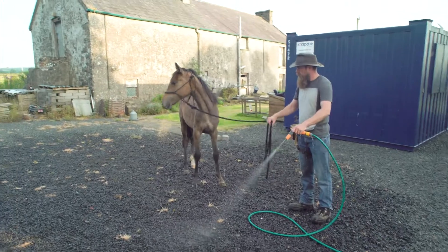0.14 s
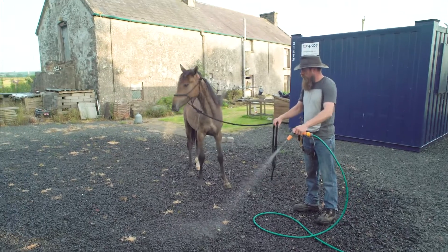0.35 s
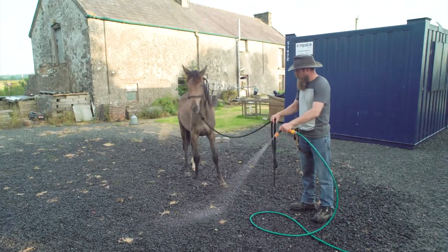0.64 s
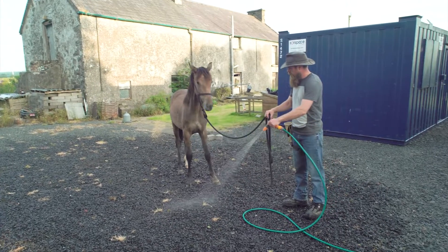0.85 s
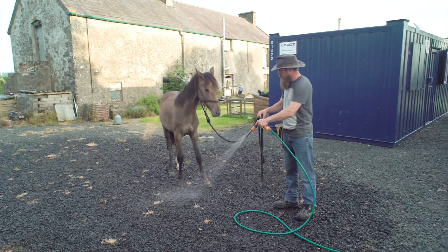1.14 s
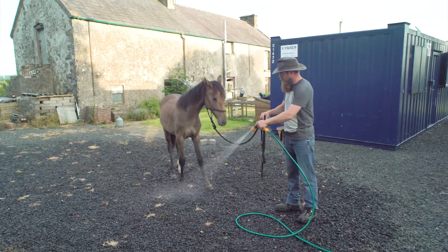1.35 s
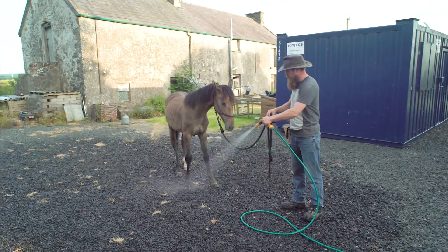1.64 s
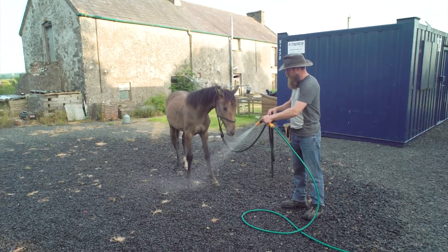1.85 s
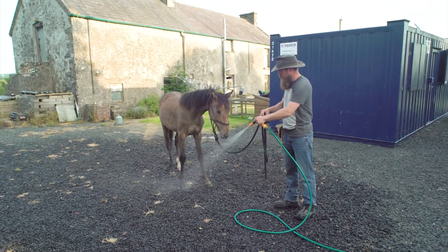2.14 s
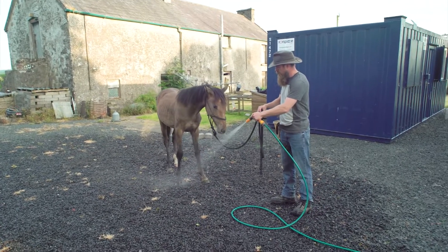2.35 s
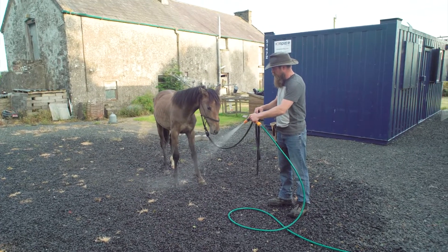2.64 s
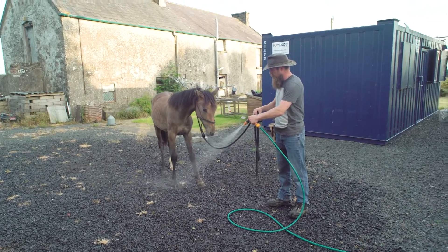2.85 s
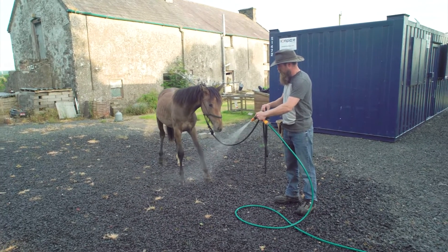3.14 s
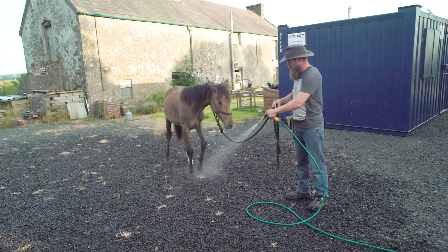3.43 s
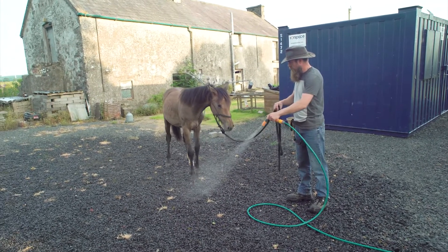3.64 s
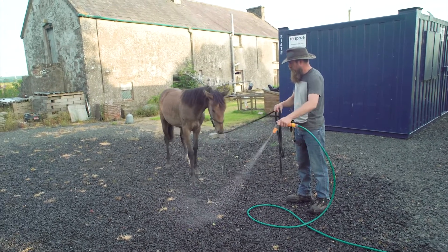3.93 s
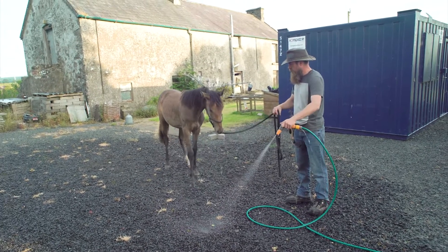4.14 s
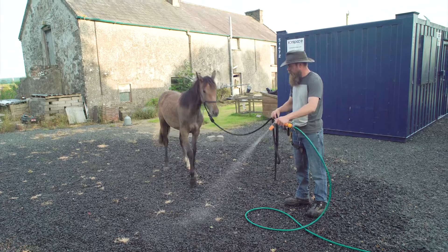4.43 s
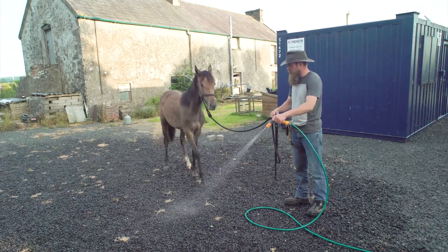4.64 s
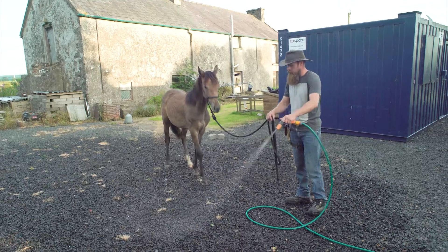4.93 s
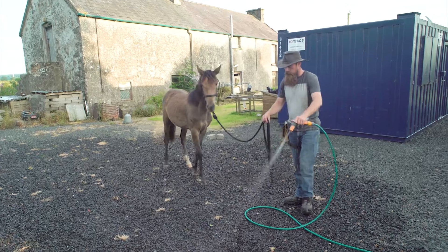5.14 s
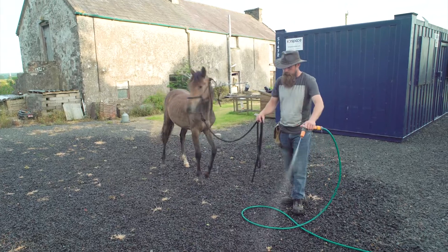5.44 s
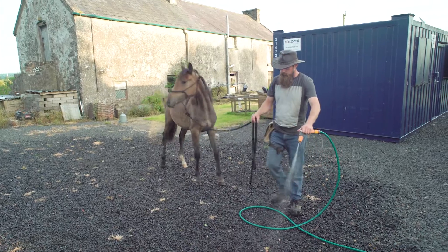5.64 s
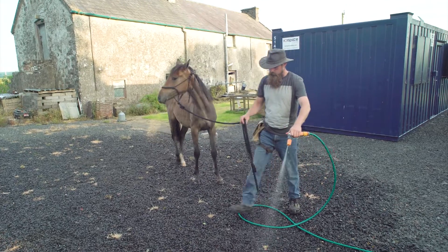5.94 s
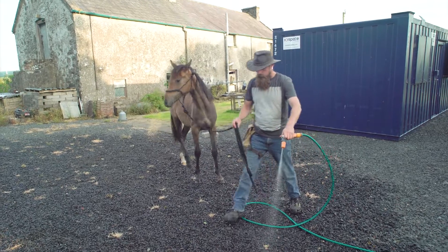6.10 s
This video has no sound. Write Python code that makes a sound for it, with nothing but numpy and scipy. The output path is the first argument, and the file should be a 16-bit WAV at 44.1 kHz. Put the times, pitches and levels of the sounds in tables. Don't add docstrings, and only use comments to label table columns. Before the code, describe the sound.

In an open farmyard, a hose nozzle sprays wet gravel a few metres from the microphone. A bright, grainy hiss starts fairly strong, with drops snapping sharply on stone and small plinks from puddles; a hollow plop comes at 0.2 s. From about 1 s the jet softens, staying lower until 3.5 s with brief spurts of spatter. A low wind buffet thumps the microphone around 2.6 s. Scattered stones knock from 0.5 s; at 3.6-3.8 s a step bites and crunches gravel with a dull push, and a scuff follows at 4.1 s. The water surges near 4.2 s, eases, then builds to its loudest at 6.3 s. Clear stone knocks and plinks cluster from 5.2 to 6 s, with a soft gravel shift at 5.8. A far bird hoots faintly at 5.1 and 5.4 s. Faint wall echoes, breeze rumble and distant machinery hum sit beneath.

```python
import sys
import numpy as np
from scipy import signal
from scipy.fft import rfft, irfft, next_fast_len
from scipy.io import wavfile

SR = 44100
rng = np.random.default_rng(int(sys.argv[2]) if len(sys.argv) > 2 else 0)


def generate_wav(signal):
    frames = np.transpose(np.atleast_2d(signal))
    scaled = np.clip(frames, -1, 1) * 32767
    pcm = np.round(scaled).astype(np.int16)
    wavfile.write(sys.argv[1], SR, pcm)


def level_to_linear(level):
    exponent = np.asarray(level, float) / 20
    return 10 ** exponent


N = 276507

# (time [s], level [dB], fineness [dB])
JET = [(0.0, -43.5, 0.1), (0.38, -43, 1.9), (1.1, -48, -1.5), (1.75, -50.5, -1.2), (2.02, -49, -0.7),
       (2.18, -48.5, -0.9), (3.16, -49.5, -1.3), (3.51, -51.5, -2), (4.05, -46.5, 1), (4.21, -42, 0.1),
       (4.35, -45.5, 2), (4.57, -47, 1.2), (4.87, -47, -0.2), (5.43, -43, 0), (5.57, -42.5, 1.4),
       (6.27, -38.5, 0.4)]
JET_HZ = [1200, 3700, 5700, 10000]
JET_FOLLOWS = [(.4, -.3), (.95, -.3), (.95, .1), (1.05, .9)]
# (time [s], boost [dB], frequency [Hz], length [s])
SURGES = [(0.187, 7, 3300, .02), (0.42, 8, 3350, 0.071), (1.005, 2, 12000, 0.15), (1.82, 6, 9000, 0.011),
          (2.194, 0.5, 2600, .1), (2.597, 1, 3730, 0.14), (4.304, 1.5, 3800, 0.2),
          (6.004, -0.5, 3750, 0.25), (2.427, 10, 5500, .006), (2.832, 4.5, 3700, .03),
          (3.077, 9, 3700, 0.017), (3.133, 8, 3700, 0.0093), (3.256, 8.5, 3640, 0.045),
          (3.431, 11, 3680, 0.017), (3.64, 9, 3620, 0.041), (3.788, 12.5, 4200, 0.009),
          (4.424, 5, 5900, .08), (4.808, 8, 5000, 0.026), (5.2, 5, 1200, 0.089), (5.2, 4.5, 550, .1),
          (5.528, 14, 400, 0.0093), (5.772, 6.5, 4280, 0.032)]
# (frequency [Hz], density [dB per Hz])
SPRAY = [(100, -8), (140, -8.5), (230, -7.5), (470, -0.5), (1000, -4.5), (2500, -3.5), (3700, -1),
         (4700, -3), (5700, -1.5), (7200, -8), (8800, -8.5), (10500, -6.5), (12200, -5), (15500, -9)]
# (frequency [Hz], share [0-1])
CRACKLE_SHARE = [(200, 0.14), (1000, 0.07), (4000, 0.34), (8000, 0.58), (14000, 0.65)]
# (time [s], peak [dB], frequency [Hz])
SNAPS = [(0.1421, -29, 12500), (0.1755, -30, 11100), (0.2895, -20, 10600), (0.451, -23, 11000),
         (1.0136, -31, 12600), (1.3339, -26, 11700), (1.5769, -32, 12000), (1.81, -28, 14800),
         (2.0832, -28, 12300), (2.2643, -28.5, 10700), (2.3516, -28, 11500), (2.859, -21, 9510),
         (3.0989, -31, 11900), (3.511, -32, 12200), (3.6067, -24.5, 12800), (3.6906, -27, 11100),
         (3.776, -26, 13400), (3.941, -30, 12200), (3.9949, -27, 14500), (4.0626, -23, 12100),
         (4.351, -27, 13100), (4.5377, -26, 13300), (4.7836, -26, 13100), (5.3747, -25, 10500),
         (5.465, -25, 12600), (5.705, -25, 13000), (5.8701, -21, 9440), (6.134, -23, 12600),
         (6.1849, -26, 8660), (6.2183, -22, 9420)]
# (time [s], peak [dB], frequency [Hz])
PLINKS = [(0.183, -34, 2920), (0.387, -33, 2900), (0.5757, -30.5, 3700), (0.7075, -27.5, 2760),
          (1.048, -34, 2650), (1.2115, -29.5, 3920), (1.499, -33.5, 3800), (1.728, -35, 3100),
          (2.2548, -28.5, 4240), (2.4262, -27.5, 5350), (2.6238, -32, 4034), (3.059, -31, 3800),
          (3.136, -32.5, 3810), (3.2422, -29.5, 3320), (5.92, -24, 5940), (3.545, -34, 3450),
          (3.62, -29.5, 3580), (4.173, -35, 3360), (4.228, -32, 3650), (4.4447, -31, 3700),
          (5.2157, -29, 5400), (5.376, -28, 5400), (5.3955, -28, 4100), (5.421, -29, 3400),
          (5.559, -30, 4030), (5.5848, -23, 5570), (5.6044, -32, 5730), (5.638, -33, 5690),
          (5.705, -21.5, 5850), (5.7055, -30, 3350)]
# (time [s], peak [dB], frequency [Hz], ringing [cycles])
PLOP = [
    (0.2255, -34.5, 440, 18),
]
# (time [s], peak [dB], upper mode [Hz], lower mode [Hz], lower mode relative level [dB])
KNOCKS = [(0.513, -41, 800, 400, -7), (1.048, -33, 1640, 447, -28), (2.097, -35, 1940, 553, -11),
          (2.628, -37, 1630, 408, -9), (3.314, -36.5, 1365, 468, -5), (3.615, -39, 2080, 620, 9),
          (3.645, -32, 1120, 600, 1), (3.7868, -30.5, 1070, 485, 2), (3.83, -35.5, 1190, 870, 4),
          (4.12, -29, 1700, 434, -13), (4.26, -34, 1700, 720, -9), (5.2495, -23.5, 1220, 457, -12),
          (5.424, -25.5, 1500, 442, -8), (5.639, -27, 1360, 970, -1), (5.751, -32, 2300, 780, -6),
          (5.766, -46, 1100, 520, 6), (5.785, -38, 1210, 460, 6.5), (5.914, -29, 1360, 770, -8),
          (6.008, -43, 2270, 405, 5)]
# (time [s], peak [dB])
STAMPS = [
    (3.617, -41),
    (3.788, -50),
    (5.786, -58),
]
# (time [s], level [dB], length [s])
CRUNCH = [
    (3.606, -39.5, 0.015),
    (3.637, -48.5, 0.075),
    (3.795, -44.5, 0.028),
    (3.834, -51, 0.046),
    (4.117, -50, .015),
    (5.765, -48, 0.12),
]
# (time [s], hold [s])
HOOTS = [
    (5.12, .15),
    (5.44, .09),
]
# (time [s], peak [dB])
SWAY = [(0.0, -20.5), (0.3, -29), (0.7, -32), (0.9, -31), (1.36, -21), (1.9, -26.5), (2.07, -30.5),
        (2.6, -26), (2.72, -26), (3.02, -28), (3.54, -32.5), (4.07, -38.5), (4.4, -31), (5.15, -35),
        (5.36, -32.5), (5.71, -36), (5.97, -31.5)]
# (time [s], peak [dB])
GUST = [
    (0.0, -50),
    (2.31, -39.5),
    (2.434, -41),
    (2.54, -32.5),
    (2.59, -28.5),
    (2.635, -22.5),
    (2.712, -28.5),
    (2.83, -40),
]
# (frequency [Hz], density [dB per Hz])
GUST_COLOUR = [(11, -81), (18, -49), (29, 1), (68, -12.5), (91, -21), (146, -26.5), (249, -46), (320, -62),
               (420, -82), (700, -120)]
# (frequency [Hz], density [dB per Hz])
BREEZE_COLOUR = [(11, -13), (18, 21), (30, -77), (35, 2), (38, -27), (43, -38), (65, -39), (81, -25),
                 (113, -31), (200, -59), (260, -74), (440, -120)]
# (frequency [Hz], width [Hz], level [dB])
HUM = [(51, 4.0, -65), (63, 4.0, -71), (105, 8.0, -77)]


def spray():
    size = next_fast_len(N)
    hz = np.maximum(np.arange(size // 2 + 1) * SR / size, 1)
    clumping = level_to_linear(3.0 * drift(35))
    big = rfft(splats(450 * clumping, spread_db=3.6, fade_s=.001), size)
    fine = rfft(splats(500 * clumping, spread_db=4.0, fade_s=.0003), size)
    finest = rfft(splats(500 * clumping, spread_db=4.0, fade_s=.0003), size)
    top = .55 / (1 + (11000 / hz) ** 8)
    fine = np.sqrt(1 - top) * fine + np.sqrt(top) * finest
    fineness = 1 / (1 + (6500 / hz) ** 6)
    drops = np.sqrt(1 - fineness) * big + np.sqrt(fineness) * fine
    hiss = rfft(rng.standard_normal(N), size)
    share = np.clip(at_hz(CRACKLE_SHARE, hz), 0, 1)
    water = (np.sqrt(1 - share) * hiss + np.sqrt(share) * drops) * level_to_linear(at_hz(SPRAY, hz))
    wobble = drift(14)
    centres = np.geomspace(130, 16000, 18)
    out = np.zeros(N)
    for centre, one in zip(centres, np.eye(18)):
        band = irfft(water * at_hz(np.c_[centres, one], hz), size)[:N]
        out += band * level_to_linear(jet_db(centre) + 0.64 * wobble + 0.32 * drift(19))
    return level_to_linear(-45) * rms_one(out)


def jet_db(hz):
    t = np.arange(0, N + 64, 64) / SR
    s, level_db, fine_db = np.transpose(JET)
    swing, fine = [at_hz(np.c_[JET_HZ, share], hz) for share in np.transpose(JET_FOLLOWS)]
    db = np.interp(t, s, swing * (level_db + 47) + fine * fine_db)
    for s, boost_db, surge_hz, length in SURGES:
        octaves = np.log2(hz / surge_hz)
        db = db + boost_db * np.exp(-((t - s) / length) ** 2 - (octaves / 0.4) ** 2)
    return np.interp(np.arange(N) / SR, t, db)


def droplets():
    born = impacts(500, spread_db=-0.5) * level_to_linear(jet_db(4400) - 53.5)
    dealt = rng.integers(0, 16, N)
    out = np.zeros(N)
    for k, hz in enumerate(np.geomspace(900, 9000, 16)):
        out += ring(born * (dealt == k), hz, 12.1 / hz) * level_to_linear(-4.0 * np.log2(hz / 4000) ** 2)
    return level_to_linear(-11.0) * out


def snaps():
    strays_per_s, stray_db, stray_spread_db = 8, -32, 3
    mist_db = jet_db(10000)
    events = list(SNAPS)
    for u_time, u_level, u_pitch in rng.random((round(strays_per_s * N / SR), 3)):
        i = int(u_time * N * .99)
        peak_db = stray_db + mist_db[i] - stray_spread_db * 2 * u_level
        events.append((i / SR, peak_db, 9500 + 4500 * u_pitch))
    out, t = np.zeros(N), np.arange(512) / SR
    shape = (np.exp(-t / .0003) + .15 * np.exp(-t / .002)) * np.minimum(t / .0002, 1)
    for s, peak_db, hz in events:
        band = signal.butter(2, [0.68 * hz, min(1.59 * hz, 16000)], "band", fs=SR, output="sos")
        burst = signal.sosfilt(band, rng.standard_normal(512) * shape)
        add(out, s + 0.0016, level_to_linear(peak_db - 3.0) * burst / np.abs(burst).max())
    return out


def plinks():
    bright = struck([(*row, 25.8) for row in PLINKS], 0.46, grit=0.58, rise_cycles=0.4)
    return bright + struck(PLOP, 0, grit=.05, rise_cycles=2.0)


def knocks():
    s, peak_db, hz, lower_hz, lower_db = np.transpose(KNOCKS)
    s = s + .0013
    upper = struck(np.c_[s, peak_db, hz, np.full_like(s, 13)], 0.41, grit=0.62, rise_cycles=0.36)
    lower = struck(np.c_[s, peak_db + lower_db, lower_hz, np.full_like(s, 9)], .1,
                   grit=0.25, rise_cycles=0.38)
    crack = struck(np.c_[s, peak_db, 2.6 * hz, np.full_like(s, 8)], -3.1, grit=0.49, rise_cycles=0.2)
    thud = struck([(s, db, 240, 7) for s, db in STAMPS], 11.8, grit=.05, rise_cycles=0.24)
    return upper + lower + crack + thud


def crunch():
    envelope, t = np.zeros(N), np.arange(8192) / SR
    for s, level_db, length in CRUNCH:
        add(envelope, s, level_to_linear(level_db) * np.exp(-t / length) * np.minimum(t / 0.00071, 1))
    band = signal.butter(2, [400, 2000], "band", fs=SR, output="sos")
    stones = signal.sosfilt(band, splats(1200, spread_db=3.0, fade_s=.0015))
    return envelope * rms_one(stones)


def yard(x):
    dull, out = signal.lfilter([.4], [1, -.6], x), x.copy()
    for delay_s, echo_db in [(.011, -35.5), (.034, -19)]:
        add(out, delay_s, level_to_linear(echo_db) * dull)
    return out


def bird():
    hoot_hz, hoot_db, edge_db_per_s = 736, -58.5, 380
    level_db = peaks_db([(s, hoot_db, hold) for s, hold in HOOTS], edge_db_per_s, edge_db_per_s)
    phase = 2 * np.pi * np.cumsum(hoot_hz * (1 + .009 * drift(12))) / SR
    voice = np.sin(phase) + level_to_linear(-3) * np.sin(1.64 * phase)
    return np.sqrt(2) * level_to_linear(level_db - 1.5 + 1.5 * drift(40)) * voice


def mount_sway():
    hz = 12.6 * (1 + 0.0598 * drift(3.14))
    level_db = peaks_db(SWAY, rise_db_per_s=90, fall_db_per_s=32.5)
    phase = 2 * np.pi * np.cumsum(hz) / SR + np.pi / 4
    return np.sqrt(2) * level_to_linear(level_db) * np.sin(phase)


def gust():
    level_db = peaks_db(GUST, rise_db_per_s=198, fall_db_per_s=298)
    return level_to_linear(level_db - 0.5 + 2.2 * drift(35)) * coloured(rng.standard_normal(N), GUST_COLOUR)


def breeze():
    return level_to_linear(-44.5 + 1.0 * drift(4.1)) * coloured(rng.standard_normal(N), BREEZE_COLOUR)


def machinery_hum():
    out = np.zeros(N)
    for hz, width, level_db in HUM:
        out += level_to_linear(level_db) * rms_one(ring(rng.standard_normal(N), hz, 2.2 / width))
    return out


def struck(events, trim_db, grit, rise_cycles):
    out, t = np.zeros(N), np.arange(4096) / SR
    for s, peak_db, hz, cycles in events:
        fade = level_to_linear(-60 * t * hz / cycles) * (1 - np.exp(-t * hz / rise_cycles))
        rough = 1 + grit * rng.standard_normal(4096)
        add(out, s, level_to_linear(peak_db + trim_db) * fade * np.sin(2 * np.pi * hz * t) * rough)
    return out


def splats(per_s, spread_db, fade_s):
    power = signal.lfilter([1], [1, -np.exp(-2 / (fade_s * SR))], impacts(per_s, spread_db) ** 2)
    return rms_one(np.sqrt(power) * rng.standard_normal(N))


def impacts(per_s, spread_db, largest=3.0):
    sizes = level_to_linear(spread_db * np.minimum(rng.exponential(1, N), largest)) * rng.choice([-1, 1], N)
    return rms_one(sizes * (rng.random(N) < per_s / SR))


def ring(clicks, hz, t60):
    r, w = level_to_linear(-60 / (t60 * SR)), 2 * np.pi * hz / SR
    return signal.lfilter([0, np.sin(w)], [1, -2 * r * np.cos(w), r * r], clicks + 1e-18)


def coloured(x, spectrum):
    hz = np.maximum(np.arange(N // 2 + 1) * SR / N, 1)
    return rms_one(irfft(rfft(x) * level_to_linear(at_hz(spectrum, hz)), N))


def drift(rate):
    r = np.exp(-40 * np.pi * rate / SR)
    slow = signal.lfilter([1], [1, -2 * r, r * r], rng.standard_normal(N // 20 + 2002))[2000:]
    return np.interp(np.arange(N) / 20, np.arange(len(slow)), rms_one(slow))


def peaks_db(rows, rise_db_per_s, fall_db_per_s):
    t = np.arange(0, N + 64, 64) / SR
    slopes = []
    for s, db, *hold in rows:
        rise = rise_db_per_s * np.maximum(s - t, 0)
        fall = fall_db_per_s * np.maximum(t - s - sum(hold), 0)
        slopes.append(db - rise - fall)
    return np.interp(np.arange(N) / SR, t, np.max(slopes, axis=0))


def at_hz(points, hz):
    point_hz, value = np.transpose(points)
    return np.interp(np.log(hz), np.log(point_hz), value)


def rms_one(x):
    return x / np.sqrt(np.mean(x ** 2) + 1e-20)


def add(out, s, burst):
    i = round(s * SR)
    out[i:i + len(burst)] += burst[:N - i]


def scene():
    water = spray() + droplets()
    stones = yard(snaps() + plinks() + knocks() + crunch())
    background = bird() + mount_sway() + gust() + breeze() + machinery_hum()
    return (water + stones + background)[None]


def band_limit(x):
    return signal.sosfilt(signal.butter(12, 16380, fs=SR, output="sos"), x)


def record(dry):
    padded = np.pad(dry, [(0, 0), (2048, 2048)], mode="reflect")
    size = next_fast_len(padded.shape[1])
    hz = np.arange(size // 2 + 1) * SR / size
    lowpass = level_to_linear(np.interp(hz, [15650, 15800, 15860], [0, -6, -70]))
    mix = irfft(rfft(padded, size) * lowpass, size)[:, 2048:2048 + N]
    return band_limit(mix)


dry = scene()
out = record(dry)
generate_wav(out)
```